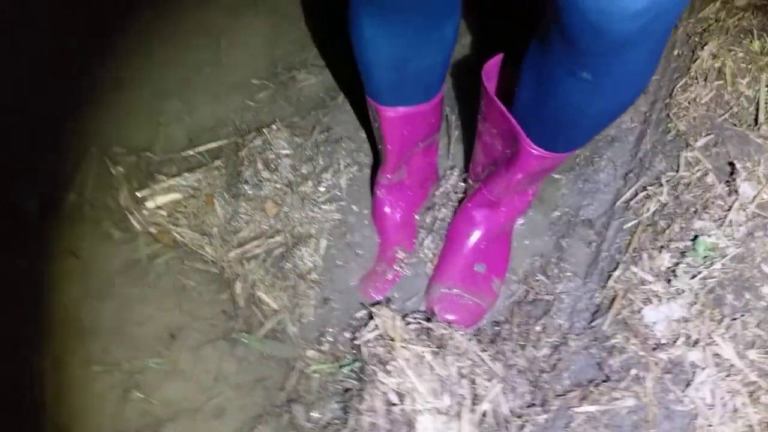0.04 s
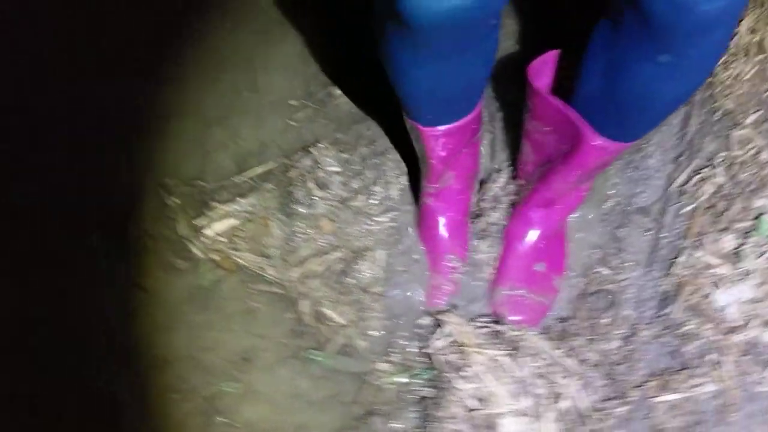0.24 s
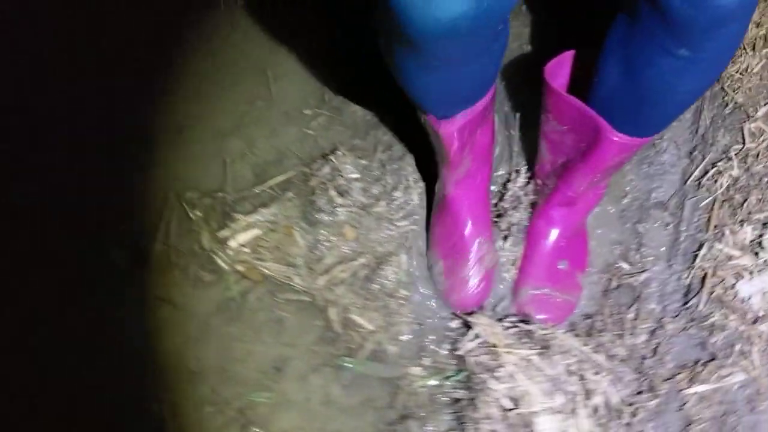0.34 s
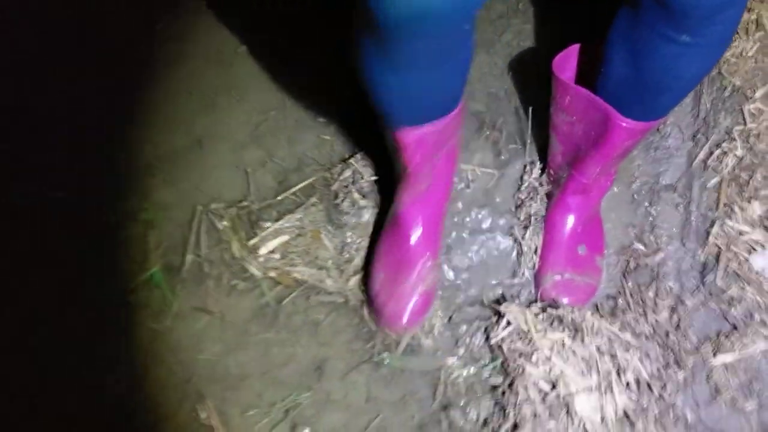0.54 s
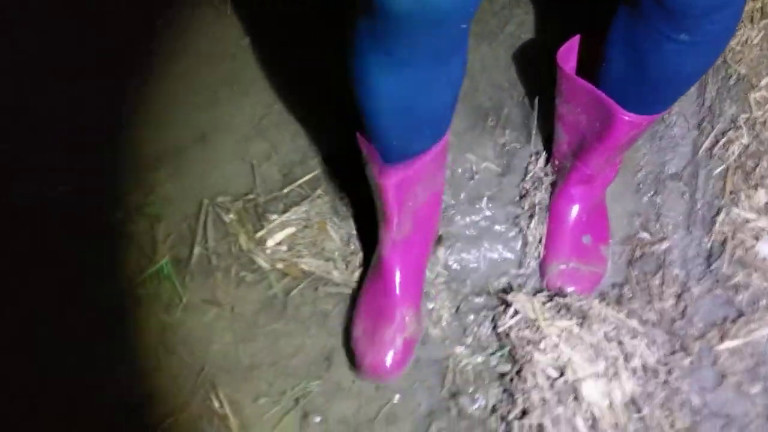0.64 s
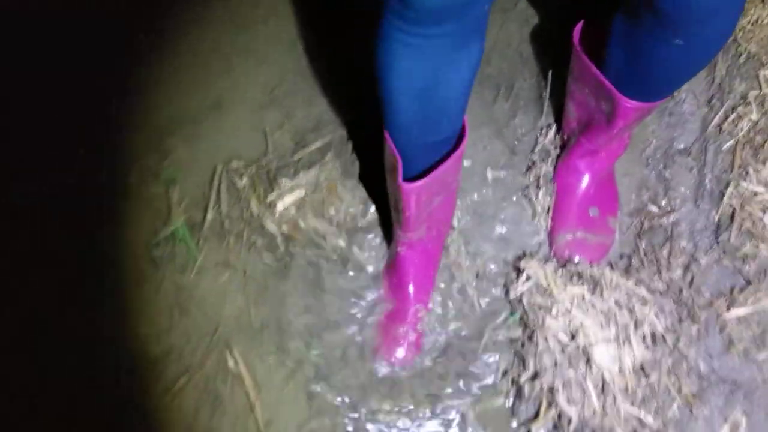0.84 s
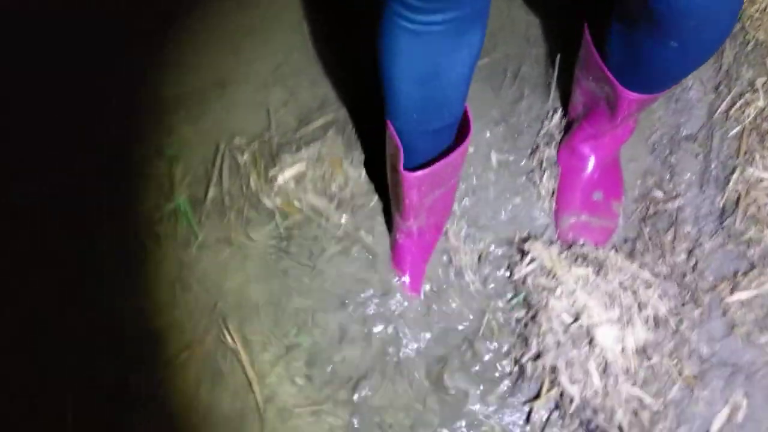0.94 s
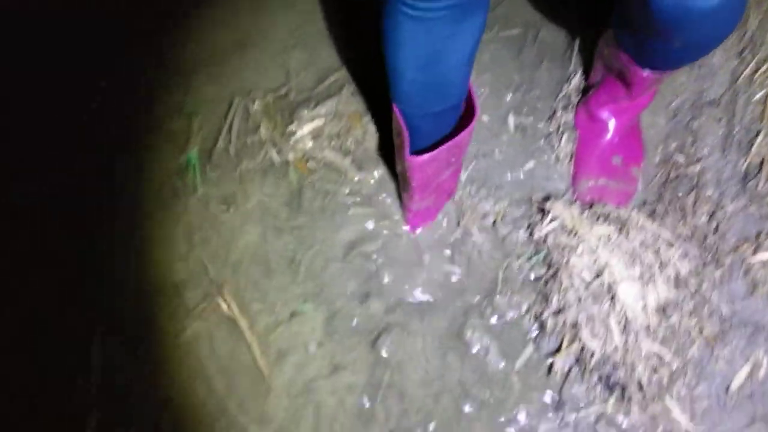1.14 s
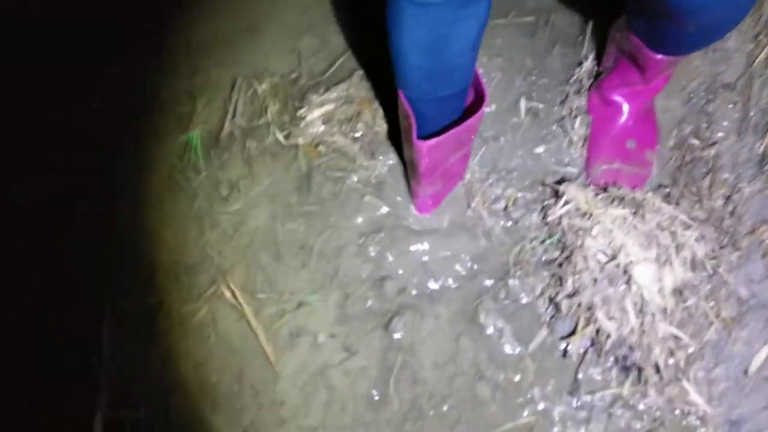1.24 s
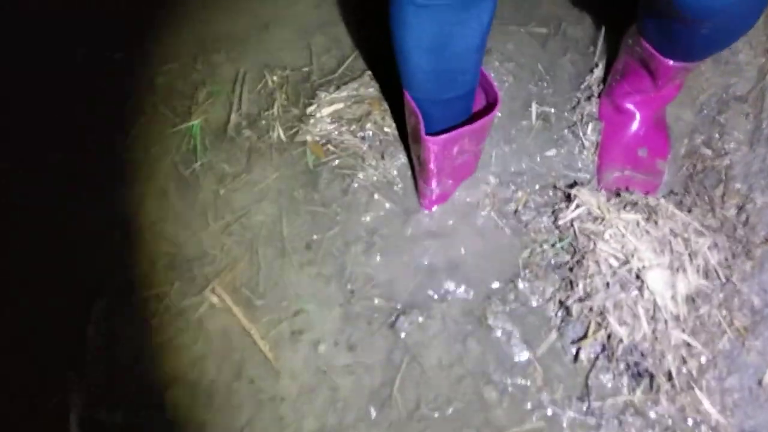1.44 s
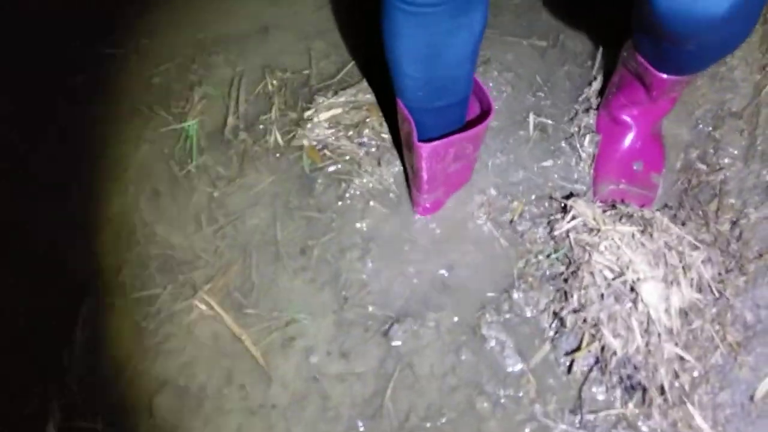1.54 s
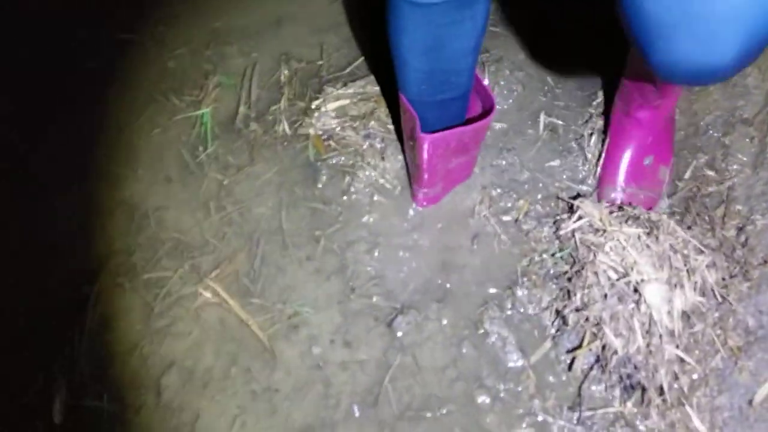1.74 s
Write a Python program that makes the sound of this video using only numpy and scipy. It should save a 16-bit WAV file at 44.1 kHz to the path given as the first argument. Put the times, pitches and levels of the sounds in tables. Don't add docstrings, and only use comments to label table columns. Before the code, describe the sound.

A rubber boot pulls from thick mud with a sharp wet suck at 0.24 seconds, popping until 0.3. Small drips follow from 0.4, then a light splash at 0.6 and a crisp watery slap with a dull thud around 0.67. A rising gulp comes at 0.81, a faint plop at 1.06, and a soft wet stir at 1.65. A fast katydid buzz stays left over faint insect hiss and low night rumble.

```python
import sys
import numpy as np
from scipy import signal
from scipy.fft import rfft, irfft
from scipy.io import wavfile
from scipy.ndimage import uniform_filter1d

SR = 44100
rng = np.random.default_rng(int(sys.argv[2]) if len(sys.argv) > 2 else 0)


def voltage_ratio(level):
    return 10 ** (np.asarray(level, float) / 20)


def wrap_up_sound(samples):
    columns = np.atleast_2d(samples).T
    tamed = np.clip(columns, -1, 1)
    steps = np.round(tamed * 32767).astype(np.int16)
    wavfile.write(sys.argv[1], SR, steps)


N = 79380


def walk(rate):
    hold = int(SR / rate)
    steps = np.repeat(rng.standard_normal(N // hold + 1), hold)
    return 1.83 * uniform_filter1d(uniform_filter1d(steps, hold), hold)[:N]


def band(hz, width):
    f = np.fft.rfftfreq(N, 1 / SR)
    bell = np.exp(-((f - hz) / width) ** 2 * 2)
    x = irfft(rfft(rng.standard_normal(N)) * bell, N)
    return x / x.std()


def tail(t60, size=6000):
    h = rng.standard_normal(size) * voltage_ratio(-60 * np.arange(size) / SR / t60)
    return h / np.sqrt(np.sum(h ** 2))


def rings(at, hz, db, cycles, size, rise=0., least_s=0., attack=0.09):
    start = np.floor(at * SR).astype(int)
    t = np.maximum(np.arange(size) / SR - (at - start / SR)[:, None], 0)
    turns = t * hz[:, None]
    decay_s = (cycles / hz + least_s)[:, None]
    shape = (1 - np.exp(-turns / attack)) * np.exp(-t / decay_s)
    wave = voltage_ratio(db)[:, None] * shape * np.sin(2 * np.pi * turns * (1 + rise * turns / 2))
    places = start[:, None] + np.arange(size)
    return np.bincount(places.ravel(), wave.ravel(), N + SR)[:N]


def night():
    # pitch_hz, level_db (per Hz)
    air = [(25, -21.5), (55, 3.5), (110, -2), (220, -10.5), (600, -17), (1800, -24.5), (6500, -29.5),
           (16000, -34.5)]
    air_db, swell_db, flicker_db = -59.5, 3.57, 0.5
    alike_bass, alike_under_hz = 0.74, 526
    out, swell = 0, walk(1.2)
    hzs, dbs = np.array(air).T
    for hz in 25 * 2 ** np.arange(0, 9.6, .5):
        db = np.interp(np.log(hz), np.log(hzs), dbs) + 10 * np.log10(hz)
        alike = np.clip(alike_bass / (1 + (hz / alike_under_hz) ** 2), 0, .99)
        shared = np.sqrt(1 + alike) * band(hz, hz / 2.5)
        opposed = np.sqrt(1 - alike) * band(hz, hz / 2.5) * np.array([[1], [-1]])
        drift_db = (swell_db * swell + flicker_db * walk(12.2)) * (hz < 1000)
        out = out + voltage_ratio(db + drift_db) * (shared + opposed)
    port_balance = voltage_ratio(np.array([[-.6], [.6]]))
    return out * voltage_ratio(air_db) / out.std() * port_balance


def far_chorus():
    # centre_hz, width_hz, level_db
    choir = [
        (4300, 1300, -74.5),
        (9450, 1100, -76),
        (12000, 3200, -70),
        (14800, 1600, -80),
    ]
    out = 0
    for hz, width, db in choir:
        out = out + voltage_ratio(db + 1.25 * walk(18.0)) * np.array([band(hz, width), band(hz, width)])
    return out


def katydid():
    # time_s, strokes_per_s
    stroke_rate = [(0.0, 93.01), (0.2, 92.86), (0.4, 93.1), (0.6, 92.94), (0.8, 92.66), (1.0, 92.76),
                   (1.2, 93.25), (1.4, 93.49), (1.6, 93.36), (1.8, 93.12)]
    stroke_phase = .587
    sweep_range_hz, sweep_end_hz, sweep_ends_s, sweep_time_s = 4700, 9350, -.0005, .0012
    sweep_peak_s, sweep_rise_s, sweep_fall_s, ring_width_s = -.0014, .001, .0006, .001
    call_db, ring_db, stroke_scatter_db = -44.5, -3, 2.2
    right_db, echo_s, echo_right_db = -21, .003, -25
    now = np.arange(N) / SR
    rate = np.interp(now, *np.array(stroke_rate).T)
    strokes = np.cumsum(rate) / SR - stroke_phase + .5
    stroke = strokes.astype(int) + 1
    u = (strokes % 1 - .5) / rate
    sweep_luck, ring_luck, pitch_luck = rng.standard_normal((stroke[-1] + 1, 3))[stroke].T
    hz = sweep_end_hz + sweep_range_hz * (1 - np.exp(-np.maximum(sweep_ends_s - u, 0) / sweep_time_s))
    width = np.where(u < sweep_peak_s, sweep_rise_s, sweep_fall_s)
    shaded_db = -2.5 * (now > 0.76)
    sweep = voltage_ratio(stroke_scatter_db * sweep_luck + shaded_db) * np.exp(-((u - sweep_peak_s) / width) ** 2)
    ring = voltage_ratio(ring_db + stroke_scatter_db / 2 * ring_luck) * np.exp(-(u / ring_width_s) ** 2)
    turns = np.cumsum(hz * (1 + .006 * pitch_luck)) / SR
    call = voltage_ratio(call_db) * (sweep + ring) * np.sin(2 * np.pi * turns)
    thin = np.diff(np.r_[0, call, 0], n=2)
    thin = np.r_[thin, np.zeros(N - len(thin))]
    echo = np.roll(thin, int(echo_s * SR))
    right = voltage_ratio(right_db) * np.roll(thin, 8) + voltage_ratio(echo_right_db) * echo
    endless = np.r_[call, call]
    reeds = [voltage_ratio(db) * signal.fftconvolve(endless, tail(0.3))[N:2 * N] for db in (-5.5, -13)]
    return np.array([call, right]) + reeds


def thuds():
    # start_s, pitch_hz, level_db
    blows = [
        (0.2378, 273, -43.5),
        (0.267, 256.5, -43),
        (0.463, 430, -56.5),
        (0.6733, 306, -37.5),
        (0.726, 344, -48.5),
        (1.058, 394, -46.5),
        (1.063, 477, -55.5),
        (1.651, 400, -53),
    ]
    at, hz, db = np.array(blows, float).T
    return -rings(at, hz, db + 8, cycles=0.59, size=1500)


def spray(count=260):
    # hold_s, level_db, fade_db_per_s, centre_hz
    showers = [(0.012, -39.5, 1201, 5450), (0.013, -45.5, 3482, 1730), (0.00315, -31, 1300, 11300),
               (0.047, -53, 696, 1100), (0.058, -70, 501, 1040), (0.00103, -45.5, 5000, 9900),
               (0.018, -53, 1499, 8200), (0.03, -57, 1801, 2420), (.011, -43.5, 2278, 3000),
               (0.011, -37.5, 1505, 8100), (0.00268, -33, 3500, 15900), (0.018, -62, 897, 6200),
               (0.11, -58, 2011, 3270), (0.00087, -49, 4998, 4260), (0.00072, -47, 3498, 14000),
               (0.00817, -58.5, 1295, 2950), (0.025, -57.5, 298.5, 3900), (0.02, -69, 494.5, 820),
               (.03, -67.5, 399, 1000), (0.19, -58, 406.5, 4380), (0.0024, -49, 1797, 11000),
               (0.0033, -61, 3003, 9400), (0.0034, -37, 1991, 10000), (.006, -48, 1495, 5000),
               (0.0055, -57, 1497.5, 10200), (0.023, -63, 300, 1420), (0.0088, -57.5, 1199, 5700)]
    shower_starts = [.2355, .2385, .2385, .252, .41, .6005, .598, .606, .6645, .665, .6728, .678, .72,
                     .8095, .8115, 1.647, 1.665, .15, 1.7, .26, .627, .8505, .665, .6885, .6885, 1.666,
                     1.647]
    spread_octaves, scatter_db, foam_level_db = 0.553, 3.6, -4.5
    out, now = 0, np.arange(N) / SR
    for start, (hold, db, fade, centre_hz) in zip(shower_starts, showers):
        time_luck, pitch_luck, size_luck = rng.random((count, 3)).T
        t = time_luck ** 1.3 * (hold + 35 / fade)
        octaves = spread_octaves * np.log(pitch_luck / (1 - pitch_luck)) / 1.95
        hz = np.clip(centre_hz * 2 ** octaves, 200, 14500)
        drop_db = db - fade * np.maximum(t - hold, 0) - scatter_db * (np.log(size_luck + 0.0038) + 1)
        drop_db = drop_db + 5 * np.log10(hz / centre_hz)
        out = out + rings(start + t, hz, drop_db, cycles=2.02, size=200, rise=.03)
        foam_db = db + foam_level_db - fade * np.maximum(now - start - hold, 0) + 3.5 * walk(300)
        opening = np.clip((now - start) / 0.00011, 0, 1)
        out = out + voltage_ratio(foam_db) * opening * band(centre_hz, centre_hz * 0.88)
    return out


def gulp():
    start_s, length_s, bend = .8095, .035, 3.8
    u = np.clip((np.arange(N) / SR - start_s) / length_s, 0, 1)
    gate = (1 - np.exp(-u / 0.023)) * np.clip((1 - u) / 0.03, 0, 1)
    out = 0
    for hz, end_hz, db, fade_db in ((1030, 2500, -33, 12), (739.8, 1200, -31, 28.5)):
        turns = np.cumsum((hz + (end_hz - hz) * u ** bend) * (u > 0)) / SR
        out = out + voltage_ratio(db - fade_db * u ** .5 + 3.4 * walk(220)) * np.sin(2 * np.pi * turns)
    return gate * out


def bubbles():
    # start_s, pitch_hz, level_db
    round_ones = [
        (0.357, 2200, -60),
        (0.5034, 3430, -57.5),
        (0.5104, 2130, -51),
        (0.5254, 2230, -53),
        (0.7031, 2850, -56),
        (0.733, 2620, -60),
        (0.776, 5480, -45),
        (0.7822, 4320, -43.5),
        (1.706, 5630, -51),
    ]
    at, hz, db = np.array(round_ones, float).T
    return rings(at, hz, db + 9.5, cycles=4.3, size=900, rise=0.0027, attack=0.31)


def pops():
    # start_s, pitch_hz, level_db
    pull_pops = [(0.2334, 2750, -53.5), (0.2358, 6300, -58), (.2535, 2295, -41), (0.2545, 1500, -33),
                 (0.2564, 2330, -36), (.2605, 2040, -38), (0.2623, 1730, -33), (0.266, 1920, -40),
                 (0.274, 1230, -55), (0.2749, 2650, -42), (0.2789, 1120, -43.5), (0.2825, 1210, -45),
                 (0.287, 1107, -37), (0.2932, 947, -48.5), (0.2985, 900, -62), (0.301, 2800, -49),
                 (0.302, 4000, -54), (0.3051, 1114, -48)]
    drip_pops = [(0.416, 2260, -49), (0.42, 3600, -53), (0.4371, 4700, -45), (0.438, 2900, -58),
                 (0.4363, 940, -51), (0.453, 5400, -46), (0.449, 6260, -49), (0.4519, 1270, -52.5),
                 (0.4628, 970, -54), (0.4754, 5500, -48), (0.4964, 5560, -47), (0.601, 3800, -51),
                 (0.41, 9300, -40), (0.6073, 1800, -33), (0.614, 4200, -56), (0.625, 2000, -47),
                 (0.627, 6900, -58), (0.94, 11000, -41), (0.627, 2260, -53)]
    step_pops = [(0.6652, 2800, -26), (0.6642, 4010, -24), (0.6671, 1910, -32.5), (0.6687, 3350, -24),
                 (0.67, 4660, -24.5), (0.6703, 2360, -35), (0.672, 3284, -34), (0.6736, 3200, -23),
                 (0.6741, 1790, -31), (0.6823, 2840, -32), (0.6884, 2380, -38), (0.6898, 3230, -41),
                 (.8128, 4600, -35), (.803, 4270, -43), (0.693, 3250, -50.5), (0.6992, 6000, -44.5),
                 (0.7122, 1780, -55), (0.7472, 5430, -44), (0.7535, 1600, -45.5), (0.7653, 4660, -47),
                 (0.7666, 2700, -49), (0.7954, 2900, -38)]
    late_pops = [(0.8505, 5900, -49.5), (0.852, 7200, -54), (0.8616, 2210, -54), (1.0575, 1590, -51.5),
                 (1.6484, 1500, -46), (1.6489, 2500, -41.5), (1.6512, 950, -51), (1.6513, 2050, -40.5),
                 (1.6555, 2700, -53), (1.656, 1900, -46), (1.666, 6600, -56), (1.6673, 3570, -50),
                 (1.672, 3700, -45), (1.6677, 1070, -51), (1.671, 2350, -62), (1.6764, 4850, -40),
                 (1.6793, 4470, -42.5), (1.687, 990, -55), (1.7015, 4560, -51), (1.6803, 946, -47),
                 (1.6805, 1750, -51.5), (1.6823, 3500, -51), (1.686, 2325, -50), (1.6878, 1760, -49),
                 (1.7095, 5360, -42.5)]
    at, hz, db = np.array(pull_pops + drip_pops + step_pops + late_pops, float).T
    cycles = 0.96 * np.exp(0.54 * rng.standard_normal(len(at)))
    return rings(at, hz, db + 9.5, cycles, size=700, rise=.012, least_s=0.00039, attack=0.6)


def film_snaps():
    # start_s, pitch_hz, level_db
    films = [(.2357, 4000, -38), (.6012, 9300, -27), (.6016, 12000, -33), (.6655, 6000, -24),
             (.6658, 12000, -24), (.6692, 6000, -27), (.6693, 11000, -30), (.6738, 6000, -24),
             (.6741, 11500, -21), (.6748, 13500, -28), (.8101, 3400, -28), (.8103, 5500, -35),
             (1.6474, 5000, -46), (1.6482, 4000, -45), (1.0565, 1000, -50)]
    at, hz, db = np.array(films, float).T
    return rings(at, hz, db + 11.0, cycles=.65, size=100, attack=0.39)


def choked_pockets():
    # start_s, pitch_hz, level_db
    muffled_pops = [(.2386, 1490, -20.5), (.2398, 2000, -14), (.2414, 1700, -20.5), (.2422, 2230, -28),
                    (.2430, 1270, -23.5), (.2392, 2530, -46), (.2443, 1550, -22.5), (.2455, 2100, -24),
                    (.2462, 1470, -24), (.2472, 2400, -25), (.2492, 2152, -18), (.2483, 1500, -25),
                    (.2497, 1090, -19.5), (.2505, 1300, -37), (.8104, 1690, -27), (.8128, 1130, -28.5),
                    (.6007, 1900, -40), (.605, 2200, -44), (.6095, 1900, -43), (.6133, 1900, -46),
                    (.6308, 2000, -37), (.6338, 2000, -43), (.6736, 1960, -28), (.2437, 2340, -20)]
    at, hz, db = np.array(muffled_pops, float).T
    choked = rings(at, hz, db + 8.0, cycles=0.96, size=400, attack=0.48)
    hollow_hz = (830, 2800)
    return signal.sosfilt(signal.butter(3, hollow_hz, "band", fs=SR, output="sos"), choked)


def at_ports(boot):
    late = np.roll(boot, 5)
    bass = signal.lfilter(*signal.butter(1, 300, fs=SR), late)
    scatter = signal.fftconvolve(np.diff(late, prepend=0), tail(.006, size=500))[:N]
    left = voltage_ratio(-5) * (late + .5 * bass + voltage_ratio(-7) * scatter)
    return np.array([left, boot])


def scene():
    boot = thuds() + spray() + gulp() + bubbles() + pops() + film_snaps() + choked_pockets()
    boot = signal.sosfilt(signal.butter(2, (90, 15300), "band", fs=SR, output="sos"), boot)
    near = at_ports(boot)
    puddle_t60_s, puddle_db = 0.028, -11.5
    wet = np.array([signal.fftconvolve(x, tail(puddle_t60_s))[:N] for x in near])
    return near + voltage_ratio(puddle_db) * wet + katydid() + night() + far_chorus()


def roll_off(x):
    return signal.sosfilt(signal.butter(12, 16480, fs=SR, output="sos"), x)


def record(dry):
    top_hz, offset = 15650, .001
    top_cut = signal.ellip(8, .3, 70, top_hz, fs=SR, output="sos")
    mix = signal.sosfilt(top_cut, dry) + offset
    return roll_off(mix)


dry = scene()
out = record(dry)
wrap_up_sound(out)
```